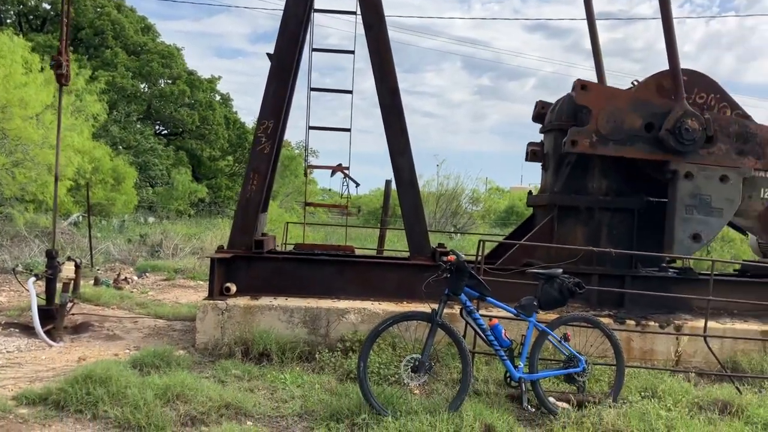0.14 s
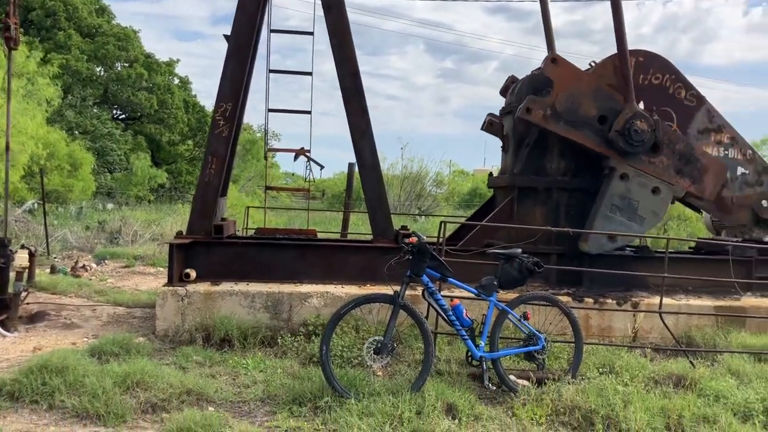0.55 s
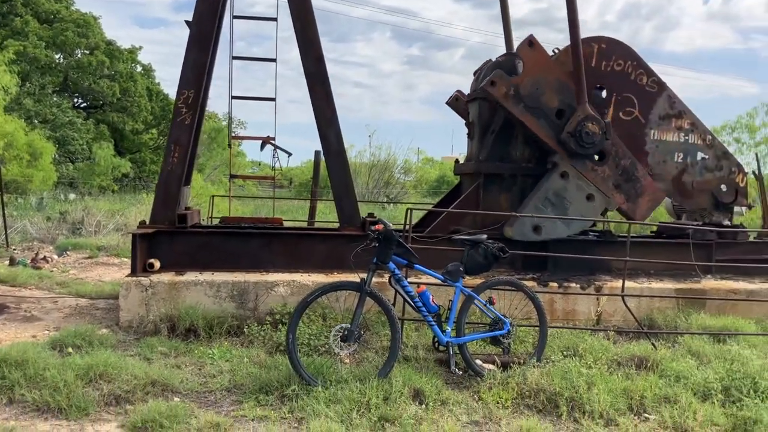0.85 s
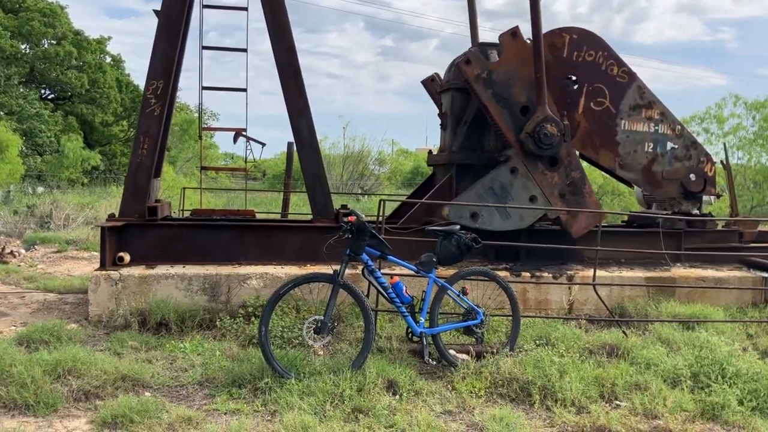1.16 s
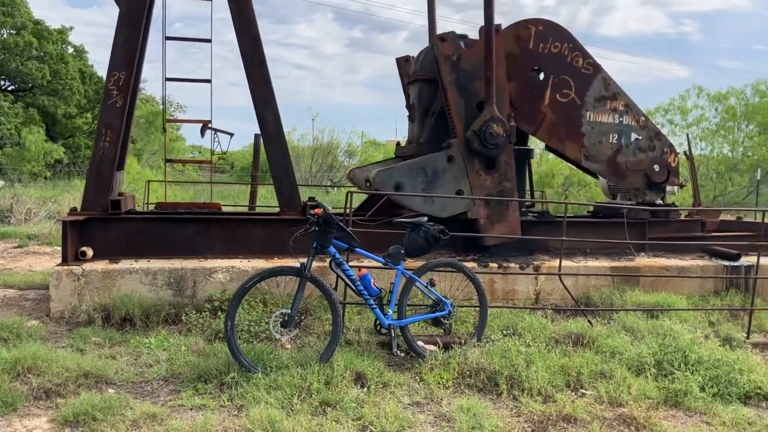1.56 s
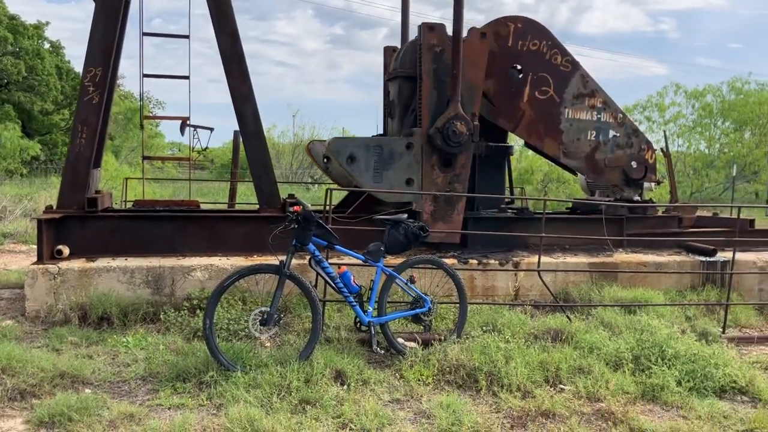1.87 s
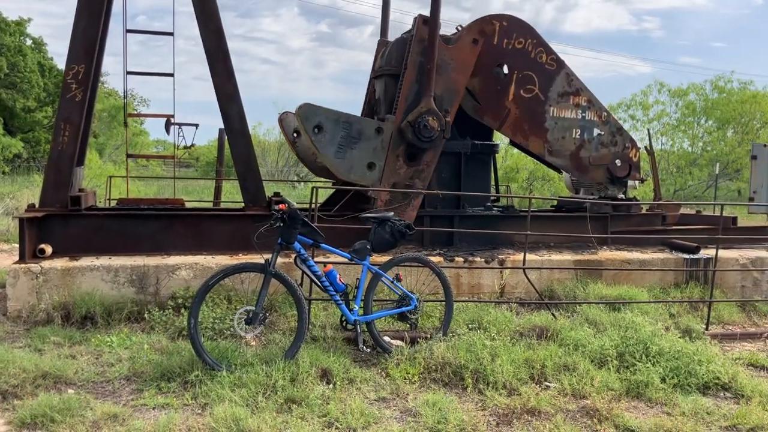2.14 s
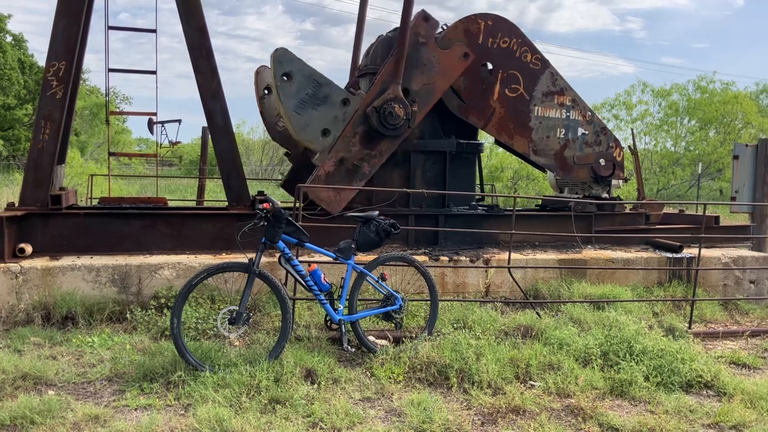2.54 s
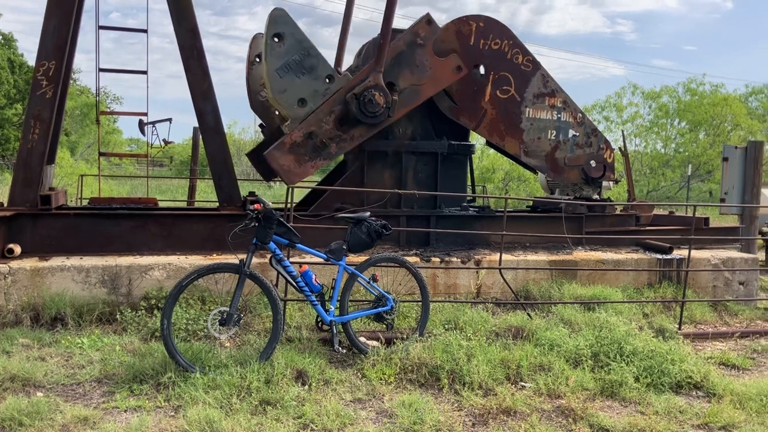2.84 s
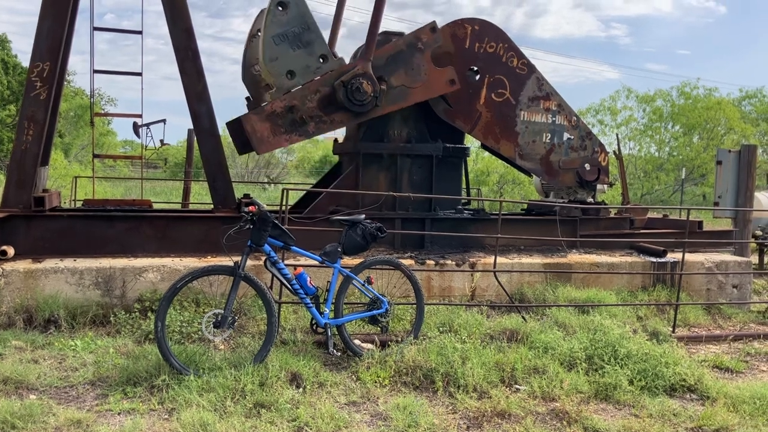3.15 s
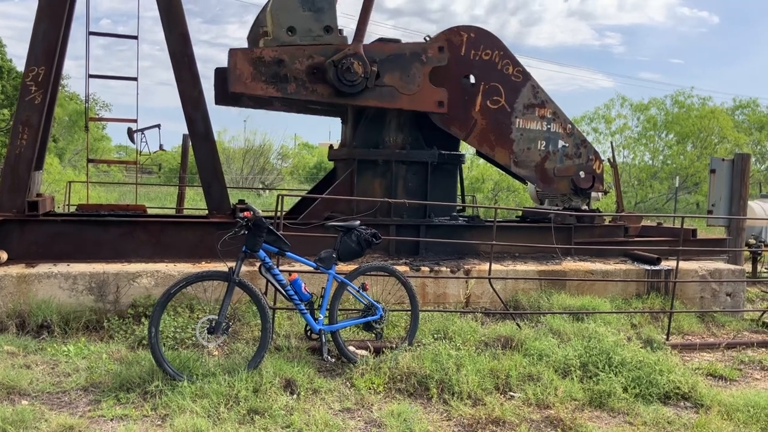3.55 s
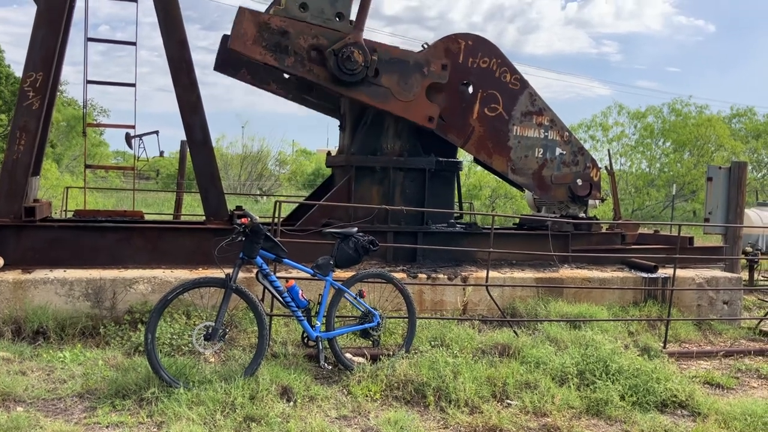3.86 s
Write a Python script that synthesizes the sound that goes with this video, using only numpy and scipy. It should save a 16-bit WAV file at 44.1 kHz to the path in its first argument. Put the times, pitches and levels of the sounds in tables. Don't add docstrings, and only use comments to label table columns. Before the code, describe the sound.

Wind buffeting dominates, light at first, then in heavy ragged bursts, stronger on the left of a bare stereo phone microphone outdoors. Behind it, faint pump whine and gears, one brief squeak, and soft field hiss.

```python
import sys
import numpy as np
from scipy import signal
from scipy.fft import rfft, irfft, next_fast_len
from scipy.io import wavfile
from scipy.ndimage import map_coordinates

SR = 44100
rng = np.random.default_rng(int(sys.argv[2]) if len(sys.argv) > 2 else 0)


def ratio_of_db(decibels):
    return 10 ** (np.asarray(decibels, float) / 20)


def inscribe(sig):
    pcm = np.round(np.clip(np.atleast_2d(sig).T, -1, 1) * 32767)
    wavfile.write(sys.argv[1], SR, pcm.astype(np.int16))


N = 176400

# (time [s], level [dB], tearing relative to flutter [dB])
AIR_FLOW = [(0.0, -50, -1), (0.15, -37, -15), (0.32, -46, -1), (0.39, -30, -24), (0.78, -40.5, -7),
            (1.06, -34, -26), (1.32, -35, -9.5), (1.45, -26, -25), (2.28, -30, -0.5), (2.57, -34, -17),
            (2.87, -23.5, 2), (3.12, -33.5, -16), (3.42, -27.5, -10), (3.43, -23.5, -11), (3.48, -30, -13),
            (3.53, -21.5, -11), (3.77, -31.5, -16), (4.0, -25.5, -42)]
# (frequency [Hz], level [dB per Hz])
FLUTTER_COLOUR = [(40, -28), (90, -4.5), (160, -0.5), (300, -3.5), (450, -7.5), (700, -18.5), (1100, -36),
                  (4000, -120)]
# (frequency [Hz], level [dB per Hz])
TEAR_COLOUR = [(100, -38), (250, -7), (500, -3), (800, -3.5), (1200, -15.5), (1800, -27), (2600, -51),
               (6500, -120)]
# (frequency [Hz], level [dB])
LEAK_LEVEL = [(60, -2), (350, 0.5), (500, -1), (650, -7), (900, -18.5), (1300, -7), (2500, -6)]
# (frequency [Hz], lead [radians])
LEAK_LEAD = [(60, 0.023), (250, 0.074), (500, 0.84), (650, 0.94), (900, 0.85), (1300, -1.03), (2500, 0.41)]


def exposed_port():
    flow_db = curve(AIR_FLOW)
    swirl_db = 1.7 * wobble(24)
    eddies, snaps = eddy_train()

    eddy_push_db = -8.5
    flutter_db = flow_db + 0.5 + swirl_db + 1.0 * wobble(35)
    flutter_size = np.hypot(ratio_of_db(flutter_db), ratio_of_db(eddy_push_db) * eddies)
    flutter = gusty(FLUTTER_COLOUR, flutter_size, spiky_db=4.0)

    tear_db = flow_db + curve(AIR_FLOW, order=2) + 0.5 + 2.3 * swirl_db + 1.05 * wobble(60)
    tear_size = np.hypot(ratio_of_db(tear_db), eddies)
    tear = gusty(TEAR_COLOUR, tear_size, spiky_db=2.5)
    bright_tear = gusty(TEAR_COLOUR, ratio_of_db(6.5) * tear_size ** 2, spiky_db=2.5, faster=1.46)

    left = flutter + tear + snaps + bright_tear
    own = ratio_of_db(-12.5) * gusty(FLUTTER_COLOUR, flutter_size, spiky_db=9.0)
    leak = lambda hz: ratio_of_db(along(LEAK_LEVEL, hz)) * np.exp(-1j * along(LEAK_LEAD, hz))
    return np.array([left + own, filtered(left - own, leak)])


# (time [s], peak level [dB], length [s])
EDDY_BURSTS = [(0.102, -25, 0.0057), (0.157, -22.5, 0.017), (0.377, -25, 0.027), (0.428, -26, 0.0085),
               (0.488, -28.5, 0.013), (0.549, -23, 0.015), (0.63, -28, 0.017), (.98, -26, 0.013),
               (1.035, -24, 0.0075), (1.364, -36, 0.018), (1.418, -24, 0.0094), (1.453, -17, 0.0079),
               (1.504, -19.5, 0.1), (1.604, -20, 0.015), (1.65, -26, 0.015), (1.666, -17, 0.054),
               (1.728, -22, 0.022), (1.804, -18.5, 0.028), (1.828, -11.5, 0.0085), (1.842, -16.5, 0.012),
               (1.874, -25, 0.018), (1.918, -19, 0.016), (1.944, -18, 0.066), (1.979, -21.5, 0.06),
               (2.047, -18, 0.032), (2.081, -19, 0.05), (2.117, -20, 0.04), (2.165, -17, 0.077),
               (2.219, -17, 0.0094), (2.239, -16, 0.011), (2.256, -16, 0.045), (2.31, -18.5, 0.037),
               (2.38, -18, 0.027), (2.459, -18, 0.013), (2.636, -25.5, 0.057), (2.682, -23, 0.017),
               (2.701, -11.5, 0.01), (2.713, -13.5, 0.028), (2.758, -22, 0.027), (2.779, -13, 0.056),
               (2.832, -24, 0.032), (2.867, -11, 0.042), (2.92, -11.5, 0.028), (2.946, -7.5, 0.022),
               (3.011, -19, 0.048), (3.188, -20.5, 0.027), (3.298, -20.5, 0.014), (3.317, -21, 0.038),
               (3.391, -19.5, 0.0068), (3.428, -8.5, 0.024), (3.503, -18.5, 0.014), (3.541, -10.5, .009),
               (3.551, -12.5, 0.025), (3.623, -17, .014), (3.636, -11, 0.0054), (3.656, -19, 0.0086),
               (3.684, -15, 0.0076), (3.856, -24, .03), (3.9, -23, .012), (3.92, -22.5, 0.023)]


def eddy_train():
    rise_s, snap_peak_s = 0.00047, 0.0014
    t = np.arange(SR // 5) / SR
    size, snaps = np.zeros(N + SR), np.zeros(N + SR)
    chance = rng.standard_normal((len(EDDY_BURSTS), 2))
    for (start, db, length), (high, side) in zip(EDDY_BURSTS, chance):
        span = slice(round(start * SR), round(start * SR) + len(t))
        rise = np.clip(t / rise_s, 0, 1)
        first_hit = 1 + 0.65 * np.exp(-t / 0.0036)
        fall = np.exp(-(t / max(length, 0.006)) ** 4)
        size[span] += ratio_of_db(db - 9.5) * rise * first_hit * fall

        snap_hz = 648 * np.exp(0.16 * high + 0.023 * (db + 15))
        snap_shape = (t / snap_peak_s * np.exp(1 - t / snap_peak_s)) ** 2
        push_or_pull = np.sign(side)
        snaps[span] += push_or_pull * ratio_of_db(db - 6) * snap_shape * np.sin(2 * np.pi * snap_hz * t)
    return size[:N], snaps[:N]


# (time [s], level [dB])
SLOW_PRESSURE = [(0.0, -37.5), (0.44, -32), (0.59, -35), (1.36, -35.5), (1.54, -24), (1.77, -34.5),
                 (2.22, -26.5), (2.45, -37.5), (2.54, -22.5), (2.6, -37.5), (2.86, -23.5), (3.05, -32.5),
                 (3.46, -22), (3.5, -24), (3.54, -17), (3.81, -30), (3.92, -22), (4.0, -35.5)]
# (frequency [Hz], level [dB per Hz])
RUMBLE_COLOUR = [(15, -31), (30, -14), (50, 6), (75, 5.5), (130, 2), (220, -10), (400, -20), (1500, -120)]
# (time [s], peak level [dB], frequency [Hz])
SHOVES = [(0.105, -23.5, 54), (0.28, -24, 79), (0.348, -16.5, 85), (1.253, -23, 95), (1.499, -43, 45.5),
          (1.502, -16, 55.7), (2.515, -15, 110), (2.79, -36, 159), (2.79, -9, 118), (3.154, -32.5, 122),
          (3.301, -14, 94), (3.431, -7.5, 85.5), (3.849, -10.5, 111)]
# (time [s], peak level [dB], frequency [Hz])
FINAL_THUMP = (3.9975, -5.5, 150)


def rumble():
    t = np.arange(N) / SR
    size = ratio_of_db(curve(SLOW_PRESSURE) + 0.5 + 2.1 * wobble(13))
    likeness = [(80, 0.55)]
    lumps = size * pair(likeness, lambda hz: ratio_of_db(along(RUMBLE_COLOUR, hz)))
    shoves = np.zeros(N)
    for start, db, hz in [*SHOVES, FINAL_THUMP]:
        half = 1.35 / hz
        swell = np.exp(-((t - start - half) / half) ** 2)
        shoves += ratio_of_db(db - 6) * swell * np.sin(2 * np.pi * hz * (t - start))
    return lumps + shoves


# (time [s], level [dB])
LOW_SLIP_LEVEL = [
    (1.14, -66.5),
    (1.162, -52),
    (1.182, -38.5),
    (1.266, -45.5),
    (1.284, -45),
    (1.304, -71),
    (1.384, -61),
    (1.42, -79),
]
# (frequency [Hz], level [dB], left leads [radians], left over right [dB], extra fade [dB per s])
LOW_SLIP_TONES = [(2283, 4.5, 1.4, 5.5, 2), (4480, -15.5, -0.81, 3, -90), (4565, -12, -0.72, 2, -39),
                  (2360, -12, 1.5, 5, -42)]


def low_slip():
    t = np.arange(N) / SR
    grip_s = 1.19
    lowest_hz = LOW_SLIP_TONES[0][0]
    inside = (t > LOW_SLIP_LEVEL[0][0]) & (t < LOW_SLIP_LEVEL[-1][0])
    squeal = np.zeros((2, N))
    for hz, db, lead, pan_db, fade_db in LOW_SLIP_TONES:
        shake = 0.62 * hz / lowest_hz * wobble(39.8)
        level = ratio_of_db(db + fade_db * np.abs(t - grip_s))
        squeal += level * tone(2 * np.pi * hz * t + shake, lead, pan_db)
    return ratio_of_db(curve(LOW_SLIP_LEVEL)) * squeal * inside


# (centre time [s], level [dB], frequency [Hz], half length [s])
HIGH_GRABS = [
    (1.287, -30, 3302, 0.035),
    (1.346, -25, 3274, 0.011),
    (1.364, -34, 3290, 0.0059),
    (1.414, -31.5, 3287, 0.021),
    (1.485, -36, 3293, 0.04),
    (1.498, -39.5, 3288, 0.035),
    (1.56, -46.5, 3296, 0.034),
    (1.594, -46, 3297, 0.028),
    (1.402, -42, 3290, 0.11),
]
# (multiple of its pitch, level [dB], left leads [radians], left over right [dB])
HIGH_TONES = [(1, 3, 1.31, 2), (2, -20, 1.67, -1), (3, -32, 8.5, -1), (1.026, -17, -1, -4)]
# (centre time [s], level [dB], frequency [Hz], half length [s])
SUM_TONE = (1.265, -63, 5597, .04)


def high_slip():
    t = np.arange(N) / SR
    bump = lambda centre, half: np.exp(-((t - centre) / half) ** 2 * 1.37)
    squeal = np.zeros((2, N))
    for centre, db, hz, half in HIGH_GRABS:
        for multiple, level, lead, pan_db in HIGH_TONES:
            grab = ratio_of_db(db + level) * bump(centre, half)
            squeal += grab * tone(2 * np.pi * hz * multiple * t, lead, pan_db)
    centre, db, hz, half = SUM_TONE
    return squeal + ratio_of_db(db) * bump(centre, half) * tone(2 * np.pi * hz * t, 0, 0)


# (time [s], level [dB])
TICK_TIMES = [
    (3.731, -43.5),
]


def metal_tick():
    t = np.arange(N) / SR
    size = sum(ratio_of_db(db - 60 * np.abs(t - at) / 0.036) * (t > at) for at, db in TICK_TIMES)
    return size * pair([(7000, 0.72)], band(6900, 900))


# (frequency [Hz], width [Hz], level [dB])
GEAR_BANDS = [(1060, 30, -60), (1333, 38, -59.5), (1512, 32, -60), (1556, 40, -64), (1620, 23, -64),
              (3424, 89, -66.5), (3720, 44, -65), (6170, 180, -67.5), (7070, 290, -67.5)]
# (frequency [Hz], level [dB], drift [dB per s], share of pitch gained [per s])
MOTOR_WHINES = [(1003.6, -52, -0.5, -.0018), (1740, -67, 1, -.0018)]
# (time [s], level [dB])
BELT_LEVEL = [
    (0, -67),
    (.35, -54.5),
    (.75, -52.5),
    (1.1, -56.5),
    (1.5, -59),
    (2.2, -63),
    (2.8, -62),
    (4, -59),
]


def pump():
    t = np.arange(N) / SR
    pan_db = -7
    sound = np.zeros((2, N))
    for hz, width, db in GEAR_BANDS:
        sound += ratio_of_db(db + 2.1 * wobble(21.94)) * pair(FAR_LIKENESS, band(hz, width))
    for hz, db, drift, sag in MOTOR_WHINES:
        phase = 2 * np.pi * hz * (t + sag * t ** 2 / 2) + 0.56 * wobble(15)
        sound += ratio_of_db(db + drift * t + 0.84 * wobble(9)) * tone(phase, 0, pan_db)
    belt_phase = 2 * np.pi * 1115 * t + 0.7 * wobble(7)
    belt = ratio_of_db(curve(BELT_LEVEL) + 2.8 * wobble(8.1)) * tone(belt_phase, 0, pan_db)
    return from_afar(sound + belt)


# (frequency [Hz], width [Hz], level [dB])
LOADED_GEAR = [(3014, 128, 14), (3136, 16, 5.5), (2992, 340, -14), (3140, 1300, 8.5)]
# (time [s], level [dB])
GEAR_LOAD = [
    (0, -79),
    (.6, -60),
    (1.2, -54.5),
    (1.6, -53.5),
    (4, -51),
]


def loaded_gear():
    teeth = sum(ratio_of_db(db) * pair([(3000, 0.81)], band(hz, width)) for hz, width, db in LOADED_GEAR)
    size = ratio_of_db(curve(GEAR_LOAD) + 1.37 * wobble(24.95))
    return turned(size * unit(teeth), lambda hz: -0.6)


# (frequency [Hz], level [dB per Hz])
FIELD_COLOUR = [(300, 4.5), (900, -5), (1700, -3.5), (2100, -10), (4500, -14), (7000, -16), (13800, -21),
                (15200, -26)]
# (frequency [Hz], likeness [0 to 1])
FAR_LIKENESS = [(1000, .85), (2500, .7), (4200, .5), (6500, .95), (9000, .995), (14000, .99)]


def field_hiss():
    size = ratio_of_db(-46 + 1.6 * wobble(13))
    return from_afar(size * pair(FAR_LIKENESS, lambda hz: ratio_of_db(along(FIELD_COLOUR, hz))))


# (frequency [Hz], left leads [radians])
FAR_LEAD = [(0, 0), (1500, -1.3), (3700, -2.2), (5500, -3.9), (7100, -6.3), (8950, -9.42), (11300, -12.57),
            (14000, -15.7), (16000, -18)]


def from_afar(x):
    return turned(x, lambda hz: np.interp(hz, *np.transpose(FAR_LEAD)))


def turned(x, lead):
    return filtered(x, lambda hz: np.exp(0.5j * lead(hz) * np.array([[1], [-1]])))


def tone(phase, lead, pan_db):
    left = ratio_of_db(pan_db / 2) * np.sin(phase + lead / 2)
    right = ratio_of_db(-pan_db / 2) * np.sin(phase - lead / 2)
    return np.array([left, right]) * np.sqrt(2)


def band(hz, width):
    return lambda f: 1 / (1 + ((f - hz) * 2 / width) ** 2)


def gusty(spectrum, gain, spiky_db, faster=1):
    colour = lambda hz: ratio_of_db(along(spectrum, hz / faster))
    rough = rng.standard_normal(N) * ratio_of_db(spiky_db * wobble(300))
    return filtered(rough * gain, colour) / np.std(filtered(rough, colour))


def pair(alike, colour):
    def response(hz):
        angle = np.arccos(np.clip(along(alike, hz), 0, 1)) / 2
        return colour(hz) * np.array([np.cos(angle), np.sin(angle)])
    mid, side = filtered(rng.standard_normal((2, N)), response)
    return unit(np.array([mid + side, mid - side]))


def filtered(x, response):
    m = next_fast_len(N + SR // 2)
    return irfft(rfft(x, m) * response(np.fft.rfftfreq(m, 1 / SR)), m)[..., :N]


def wobble(rate):
    knots = rng.standard_normal(4000)
    return map_coordinates(knots, [np.arange(N) * rate / SR])


def curve(rows, order=1):
    return np.interp(np.arange(N) / SR, *np.transpose(rows)[[0, order]])


def along(points, hz):
    f, v = np.transpose(points)
    return np.interp(np.log(hz + 1), np.log(f + 1), v)


def unit(x):
    return x / np.sqrt(np.mean(x ** 2) + 1e-20)


def scene():
    wind = exposed_port() + rumble()
    bearing = low_slip() + high_slip() + metal_tick()
    return wind + bearing + pump() + loaded_gear() + field_hiss()


def low_pass(x):
    return signal.sosfilt(signal.butter(12, 15500, fs=SR, output="sos"), x)


def record(dry):
    return low_pass(dry)


dry = scene()
out = record(dry)
inscribe(out)
```